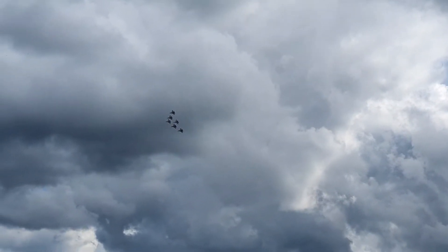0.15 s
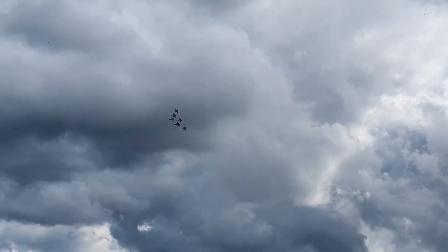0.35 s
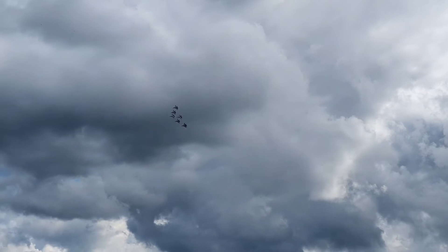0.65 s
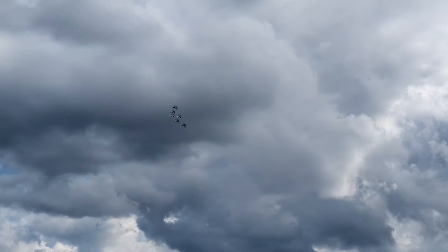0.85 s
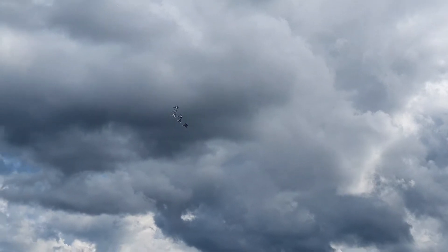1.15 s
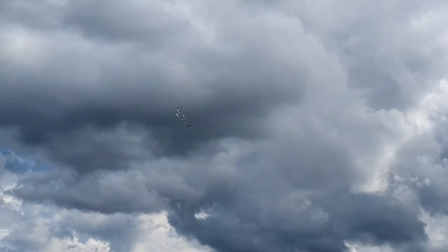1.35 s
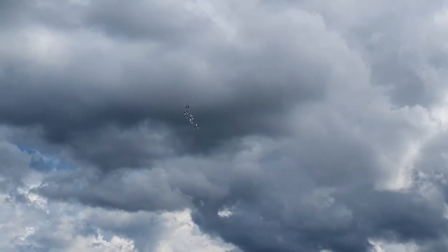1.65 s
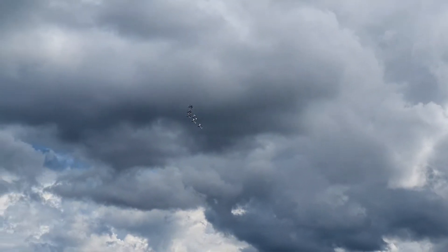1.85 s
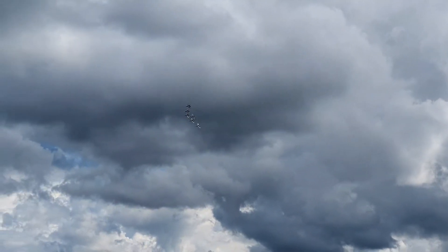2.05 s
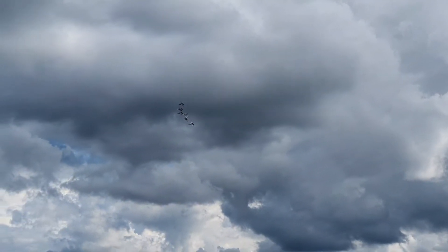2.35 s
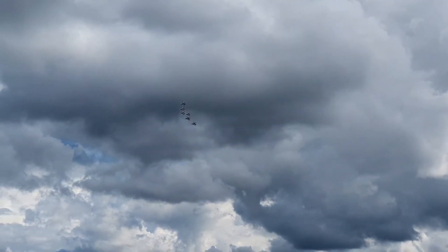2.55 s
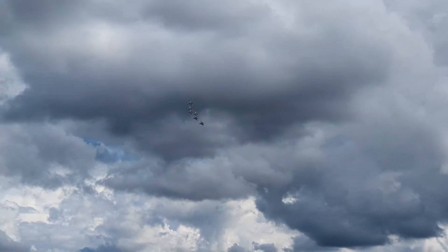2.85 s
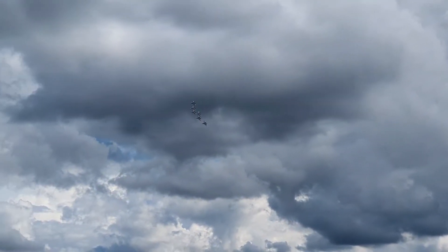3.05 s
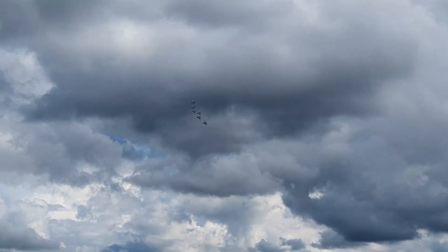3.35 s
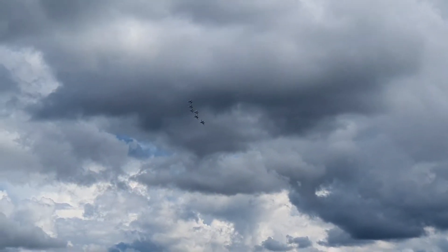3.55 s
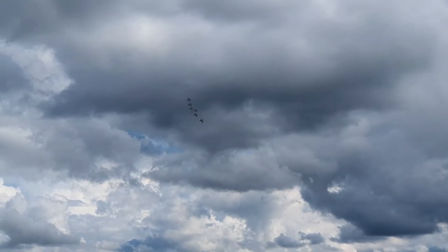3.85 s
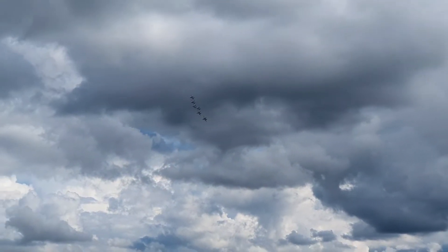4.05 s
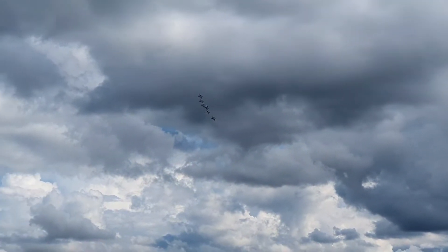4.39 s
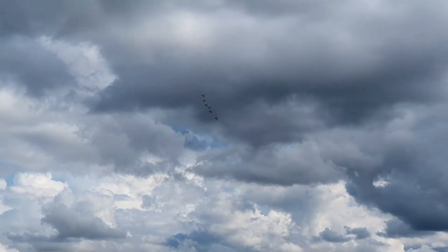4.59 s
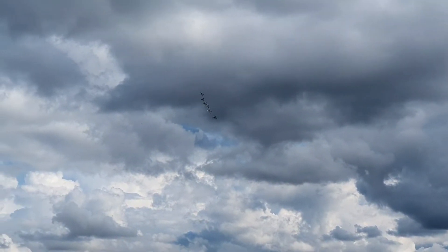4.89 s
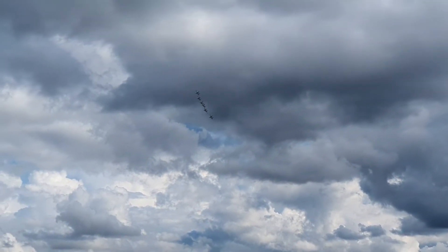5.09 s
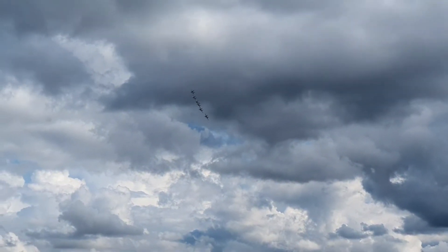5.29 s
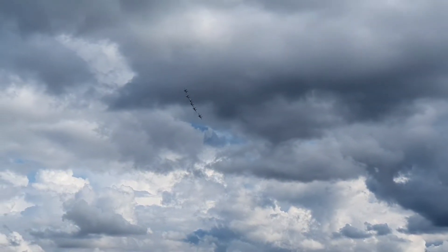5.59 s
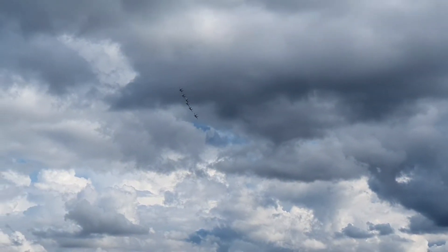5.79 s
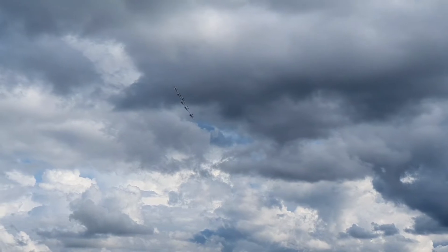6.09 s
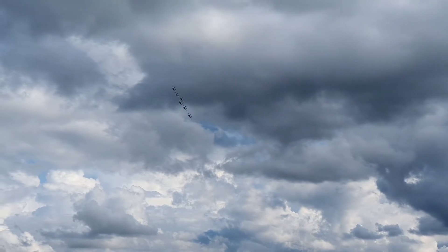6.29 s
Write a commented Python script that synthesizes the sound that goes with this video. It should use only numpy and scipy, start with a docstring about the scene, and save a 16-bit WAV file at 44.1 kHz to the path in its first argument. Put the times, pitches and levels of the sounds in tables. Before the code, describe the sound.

Deep, dull jet roar from a distant fighter formation overhead, surging loudly, sinking to a low rumble, then swelling again in uneven waves.

```python
"""Jet formation over an airfield

Jet fighters wheel high overhead, heard at two microphones. The exhaust roar is shaped noise that swells in
waves, dulled by the long air path and hollowed by a ground echo. Under it: deep rumble noise, wind buffeting
and hiss that follow one breeze curve, a thin wavering sine, and faint short bursts of high noise."""
import sys
import numpy as np
from scipy import signal
from scipy.fft import rfft, irfft
from scipy.io import wavfile
from scipy.ndimage import uniform_filter1d, minimum_filter1d

SR = 44100
rng = np.random.default_rng(int(sys.argv[2]) if len(sys.argv) > 2 else 0)


def wav_record(signal):
    """Record a signal, one row per channel, as 16-bit PCM in the file named by sys.argv[1]."""
    frames = np.transpose(np.atleast_2d(signal))
    bounded = np.clip(frames, -1, 1)
    # unit amplitude maps onto the largest positive 16-bit level
    quanta = np.round(bounded * 32767).astype(np.int16)
    wavfile.write(sys.argv[1], SR, quanta)


N = 283563

FRAME, HOP = 1024, 256  # samples
TIME_S = np.arange(N) / SR
FRAME_S = np.arange(N // HOP + 5) * HOP / SR
BIN_HZ = np.fft.rfftfreq(FRAME, 1 / SR)

# roar registers boom, rush, rasp: low edge f/Hz, high edge f/Hz
REGISTERS_HZ = [(170, 500), (500, 1100), (1100, 3000)]
# roar spectrum, falling steeply where the air absorbs it: f/Hz, relative density/dB
ROAR_COLOUR = [(110, -23.5), (190, -5), (280, 2), (400, -0.9), (500, -5.5), (700, -7), (830, -9.5),
               (980, -10), (1170, -12.5), (1420, -10.5), (1640, -19.5), (1900, -16), (2230, -22),
               (2480, -31), (2800, -36.5), (3400, -49), (5000, -65), (8000, -93.5), (11000, -125)]
# rumble spectrum: f/Hz, relative density/dB
RUMBLE_COLOUR = [(8, -60.5), (22, -29), (42, -9), (64, 3), (100, 1.5), (140, -2), (190, -4.5), (300, -22.5),
                 (700, -53), (5000, -125)]
# wind-buffeting spectrum: f/Hz, relative density/dB
GUST_COLOUR = [(8, -46.5), (22, -7.5), (55, 0.5), (110, -0.5), (200, -5.5), (400, -17), (4000, -115)]
# hiss spectrum: f/Hz, relative density/dB
HISS_COLOUR = [(1500, -18.5), (3300, -4), (3900, -5), (4250, 1), (5200, -7.5), (6100, -2.5), (6800, -7.5),
               (7400, -7), (8200, -21), (9300, -15), (9800, -50), (13000, -80)]
# microphone pair: f/Hz, likeness/0-1, phase lead of left/rad, left minus right/dB
PORTS = [(35, 1, 0.6, 0.5), (130, 0.95, -0.64, -0.2), (340, 0.96, 0.06, 0.2), (520, 0.75, 0, 2),
         (690, 0.88, -1.14, 0.8), (810, 0.95, -0.86, 0), (1020, 1, -1.63, -0.5), (1450, 0.91, -1.41, 0.6),
         (1710, 0.85, -2.5, -2), (2010, .7, -2, -2.5), (2420, 0.9, -2, -0.5), (2500, 0.3, -3, 3.5),
         (2820, 0.7, -3, 4.3), (3350, 0, 0, 0.5), (4400, 0.6, 1, 0), (5100, 0.6, 2.5, 6),
         (6000, .5, 1, -2.5), (7400, .5, 2.5, -4.5), (8400, 1, 3, 9)]
# low boom of the roar: t/s, level/dB before brief changes and eddies
BOOM = [(0, -18), (0.22, -16.5), (0.4, -12.5), (0.7, -11.5), (0.8, -9.5), (1.03, -13), (1.11, -19),
        (1.75, -19.5), (2.22, -17.5), (2.35, -23), (2.65, -24.5), (2.9, -21.5), (3.1, -18.5), (3.28, -19.5),
        (3.53, -19.5), (3.66, -25), (3.96, -19), (4.25, -15), (4.62, -14), (4.8, -18), (5.3, -19.5),
        (5.5, -16), (5.74, -14.5), (5.92, -21), (6.42, -19.5)]
# middle rush of the roar: t/s, level/dB before brief changes and eddies
RUSH = [(0, -22.5), (0.2, -24), (0.4, -19), (0.63, -13.5), (0.72, -18), (0.89, -15.5), (1.04, -22),
        (1.35, -27.5), (2.4, -28), (2.86, -28.5), (3, -25), (3.5, -22), (3.95, -24), (4.22, -13.5),
        (4.42, -12), (4.7, -17), (4.8, -21), (5.25, -24), (5.52, -18.5), (5.76, -17), (5.97, -21),
        (6.42, -14.5)]
# rasp on top of the roar: t/s, level/dB before brief changes and eddies
RASP = [(0, -26), (0.22, -25.5), (0.35, -23), (0.48, -26), (0.62, -22.5), (0.9, -24), (1.25, -30.0),
        (2.65, -31.5), (3.3, -30), (3.98, -28), (4.35, -21), (4.68, -24), (5, -30.5), (5.25, -29.5),
        (5.6, -25.5), (6, -26), (6.25, -24), (6.42, -22)]
# boom slope, changing from wave to wave: t/s, slope/(dB per octave)
BOOM_TILT = [(0, -0.5), (0.75, -3), (1.5, 5), (2.4, -1), (3.1, 0.5), (4.2, -3), (5.0, -1.5), (5.6, 5),
             (6.4, 7.5)]
# ground echo, sooner on the whole as the jets sink: t/s, delay/ms, strength/0-1 before frequency limits
ECHO = [(0, 3.2, .15), (0.35, 3.2, .5), (0.65, 3.14, .64), (0.92, 3.22, .66), (1.2, 3.25, .28),
        (2.3, 3.0, .12), (3.1, 2.95, .33), (3.95, 2.85, .25), (4.35, 2.87, .7), (4.8, 2.8, .3),
        (5.2, 2.68, .4), (5.7, 2.6, .46), (6.4, 2.65, .62)]
# brief level changes of roar and rumble: t/s, peak change/dB, centre f/Hz
BRIEF_CHANGES = [(0.037, 2.5, 430), (0.378, 4, 300), (0.462, 3, 450), (0.609, 3.5, 330), (0.713, 0, 180),
                 (0.81, -0.5, 71), (0.841, 3.5, 430), (0.893, 6, 570), (2.05, 7, 69), (3.008, 4, 453),
                 (3.109, 5.3, 290), (3.505, 6.5, 200), (4.075, 4, 180), (4.159, 4, 420), (4.283, 7.5, 240),
                 (4.408, 9.5, 504), (4.604, 5, 346), (5.436, 7.5, 210), (5.539, 8, 480), (5.684, 4.5, 397),
                 (5.745, 4.5, 260), (6.325, 8, 500)]
# rumble: t/s, level/dB before trim and brief changes
RUMBLE = [(0, -27), (0.43, -27.5), (0.72, -20), (0.95, -23), (1.45, -31.5), (1.8, -27), (2.65, -28),
          (3.5, -24), (3.75, -25.5), (4.05, -23), (4.65, -21), (4.8, -26.5), (5.45, -21.0), (5.95, -24.5),
          (6.42, -24.5)]
# light breeze, as its hiss: t/s, level/dB before patches
BREEZE = [(0.03, -60), (0.4, -69), (0.85, -64), (1.01, -74), (1.76, -66.5), (1.9, -64), (2.56, -62),
          (2.74, -68.5), (3.59, -58), (4.13, -64), (4.19, -60), (4.24, -70.5), (4.64, -65), (5.0, -67),
          (5.33, -65), (5.7, -65.5), (6.3, -68.5)]
# faint short bursts of high noise: t/s, level/dB before trim and fade, centre f/Hz, width/Hz, left minus right/dB
BURSTS = [(3.116, -54, 12500, 800, -19), (3.196, -56, 12500, 1000, -15), (4.17, -56.5, 9000, 3500, 1),
          (4.482, -56, 5800, 1600, 14), (4.924, -56, 7500, 3200, 9), (5.606, -52, 7500, 4830, 7),
          (5.817, -53, 6200, 3000, 5)]

RUSH_TILT_DB_PER_OCT, RUSH_TILT_RISE_DB_PER_OCT_S = -2, 1.1  # rush brightens with time
BLUR_HZ, SCATTER_HZ = 270, 1700  # echo fades below / above these
CHANGE_S, CHANGE_CYCLES, CHANGE_OCTAVES = 0.011, 3.6, 0.8  # half-widths; the cycles make deep ones longer
GUST_PEAK_DB, GUST_DB_PER_HISS_DB = -30.5, 0.28  # before lumps
WHINE_HZ, WHINE_DB = 9100, -79.5  # centre; rms before balance
CUTOFF_HZ = 13500


def gain_of(db):
    """Decibels to an amplitude factor."""
    return 10 ** (np.asarray(db) / 20)


def evened(x):
    """Scale to unit rms."""
    return x / np.sqrt(np.mean(x ** 2) + 1e-20)


def over_time(rows, t_s):
    """Interpolate each column of a time table at t_s."""
    knots_s, *columns = np.transpose(rows)
    return [np.interp(t_s, knots_s, column) for column in columns]


def over_bins(rows):
    """Interpolate each column of a spectrum table at every bin, on log frequency."""
    knots_hz, *columns = np.transpose(rows)
    return [np.interp(np.log(BIN_HZ + 1), np.log(knots_hz), column) for column in columns]


def patches(span_s, span_hz):
    """Smooth random field over time and frequency, unit rms."""
    shape = (len(FRAME_S), len(BIN_HZ))
    field = np.fft.rfft2(rng.standard_normal(shape))
    along = np.fft.fftfreq(shape[0], HOP / SR)[:, None] * span_s
    across = np.fft.rfftfreq(shape[1], SR / FRAME) * span_hz
    field *= np.exp(-np.pi * (along ** 2 + across ** 2))
    field[0, 0] = 0  # zero mean
    return evened(np.fft.irfft2(field, shape))


def band_rms(field, lo_hz, hi_hz):
    """Band level per frame in the mean of the two microphones, from likeness and phase."""
    likeness, phase_rad, _ = over_bins(PORTS)
    shared = (1 + np.clip(likeness, 0, 1) * np.cos(phase_rad)) / 2
    in_band = (BIN_HZ >= lo_hz) * (BIN_HZ < hi_hz)
    return np.sqrt((field ** 2 * shared * in_band).sum(-1, keepdims=True))


def steady_noise(steadiness=0.53, span_frames=9, span_bins=7):
    """White-noise short-time spectra, chance swells partly levelled by local power."""
    white = rng.standard_normal((len(FRAME_S) - 1) * HOP)
    spectra = signal.stft(white, nperseg=FRAME, noverlap=FRAME - HOP)[2].T
    power = uniform_filter1d(abs(spectra) ** 2, span_frames, 0)
    power = uniform_filter1d(power, span_bins, 1)
    spectra = spectra / power ** (steadiness / 2)
    return spectra / np.sqrt(np.mean(abs(spectra) ** 2))


def noise_at_ports(field):
    """Noise of the given short-time spectrum at two microphones, partly alike and phase-shifted."""
    likeness, phase_rad, balance_db = over_bins(PORTS)
    likeness = np.clip(likeness, 0, 1)
    left = steady_noise()
    right = likeness * left + np.sqrt(1 - likeness ** 2) * steady_noise()
    right = right * np.exp(-1j * phase_rad)
    pair = np.array([left * gain_of(balance_db / 2), right * gain_of(-balance_db / 2)])
    sound = signal.istft((pair * field).swapaxes(1, 2), nperseg=FRAME, noverlap=FRAME - HOP)[1]
    overlap_gain = np.sqrt(3 / 4)
    return overlap_gain * sound[:, :N]


def brief_changes_db():
    """Brief level changes of roar and rumble, Gaussian in time and in octaves about each centre."""
    t_s = FRAME_S[:, None]
    change_db = 0
    for s, db, hz in BRIEF_CHANGES:
        in_time = np.exp(-((t_s - s) / (CHANGE_S + CHANGE_CYCLES / hz)) ** 2)
        in_pitch = np.exp(-(np.log2((BIN_HZ + 1) / hz) / CHANGE_OCTAVES) ** 2)
        change_db = change_db + db * in_time * in_pitch
    return change_db


def roar(flutter_db=0.84, flutter_s=0.016, patchy_db=1.46, patch_s=0.04, patch_hz=170,
         boom_hz=330, rush_hz=740, rasp_hz=1400):
    """Exhaust turbulence noise, combed by the ground echo and shaken by the moving air."""
    t_s = FRAME_S[:, None]
    delay_ms, strength = over_time(ECHO, t_s)
    lag_turns = BIN_HZ * delay_ms / 1000
    strength = strength * np.exp(-(BIN_HZ / SCATTER_HZ) ** 2)  # rough ground scatters treble
    strength = strength * (1 - np.exp(-(BIN_HZ / BLUR_HZ) ** 2))  # deep roar fills its lowest notch
    # direct sound plus echo: notches climb as the delay shortens
    field = gain_of(over_bins(ROAR_COLOUR)[0]) * abs(1 + strength * np.exp(-2j * np.pi * lag_turns))

    boom_octaves = np.log2(np.clip(BIN_HZ, *REGISTERS_HZ[0]) / boom_hz)
    field = field * gain_of(over_time(BOOM_TILT, t_s)[0] * boom_octaves)
    rush_octaves = np.log2(np.clip(BIN_HZ, *REGISTERS_HZ[1]) / rush_hz)
    rush_tilt = RUSH_TILT_DB_PER_OCT + RUSH_TILT_RISE_DB_PER_OCT_S * t_s
    field = field * gain_of(rush_tilt * rush_octaves)

    # registers swell as the exhaust beams sweep past, each blending into its neighbours
    centres_hz = (boom_hz, rush_hz, rasp_hz)
    swell_db = 0
    for curve, edges_hz, own in zip((BOOM, RUSH, RASP), REGISTERS_HZ, np.eye(len(REGISTERS_HZ))):
        share = over_bins(list(zip(centres_hz, own)))[0]
        present_db = 20 * np.log10(band_rms(field, *edges_hz))
        swell_db = swell_db + share * (over_time(curve, t_s)[0] - present_db)

    # eddies on the way: broad flutter, narrow blooms
    eddies_db = flutter_db * patches(flutter_s, 1300) + patchy_db * patches(patch_s, patch_hz)
    return noise_at_ports(field * gain_of(swell_db + brief_changes_db() + eddies_db))


def rumble(trim_db=-0.3, lumpy_db=0.2):
    """Deepest exhaust noise, nearly alike at both microphones."""
    colour = gain_of(over_bins(RUMBLE_COLOUR)[0])
    swell_db = over_time(RUMBLE, FRAME_S[:, None])[0] + lumpy_db * patches(0.027, 120)
    level_db = trim_db + swell_db + brief_changes_db()
    return noise_at_ports(colour / band_rms(colour, 20, 170) * gain_of(level_db))


def gusts(lumpy_db=7.5):
    """Breeze buffeting each microphone independently, in short puffs of low noise."""
    colour = gain_of(over_bins(GUST_COLOUR)[0])
    breeze_db = over_time(BREEZE, FRAME_S[:, None])[0]
    blow_db = GUST_PEAK_DB + GUST_DB_PER_HISS_DB * (breeze_db - breeze_db.max())
    puffs_db = lumpy_db * np.tanh(patches(0.07, 300))
    field = colour / np.linalg.norm(colour) * gain_of(blow_db + puffs_db)
    return np.array([noise_at_ports(field)[port] for port in range(2)])  # fresh noise per side


def hiss(patchy_db=1.9):
    """Faint airy noise close by, swelling with the breeze."""
    colour = gain_of(over_bins(HISS_COLOUR)[0])
    swell_db = over_time(BREEZE, FRAME_S[:, None])[0] + patchy_db * patches(0.037, 900)
    return noise_at_ports(colour / band_rms(colour, 4170, 8000) * gain_of(swell_db))


def whine(waver_hz=16, flicker_db=4):
    """Thin sine, its pitch and level wandering with smoothed noise of the given rms."""
    drift, flicker = (evened(uniform_filter1d(noise, size=1200)) for noise in rng.standard_normal((2, N)))
    phase_rad = 2 * np.pi * np.cumsum(WHINE_HZ + waver_hz * drift) / SR
    tone = gain_of(flicker_db * flicker) * np.sin(phase_rad)
    balance_db = [[3], [-4]]  # left, right
    return gain_of(WHINE_DB) * evened(tone) * gain_of(balance_db)


def high_bursts(rise_s=.0015, decay_s=0.0086, trim_db=0.5):
    """Faint short bursts of high noise, panned by level, with a fast rise and decay."""
    out = np.zeros((2, N))
    length = FRAME * 2
    hz = np.fft.rfftfreq(length, 1 / SR)
    age_s = TIME_S[:length]
    fade = (1 - np.exp(-age_s / rise_s)) * np.exp(-age_s / decay_s)
    for s, db, pitch_hz, width_hz, pan_db in BURSTS:
        band = np.exp(-((hz - pitch_hz) / width_hz) ** 2)
        burst = irfft(rfft(rng.standard_normal((2, length))) * band)
        placed = evened(burst * gain_of([[pan_db / 2], [-pan_db / 2]]))
        out[:, round(s * SR):][:, :length] += gain_of(trim_db + db) * placed * fade
    return out


def scene():
    """Sum of roar, rumble, buffeting, hiss, whine and high noise bursts."""
    return roar() + rumble() + gusts() + hiss() + whine() + high_bursts()


def record(dry, ceiling=0.98, low_cut_hz=21):
    """Microphone bass loss, smooth peak limiter, softened ends, then the band limit."""
    dry = signal.sosfilt(signal.butter(2, low_cut_hz, "highpass", fs=SR, output="sos"), dry)
    allowed = np.minimum(1, ceiling / (abs(dry).max(0) + 1e-9))
    ease = signal.windows.hann(301)
    cut = signal.oaconvolve(1 - minimum_filter1d(allowed, size=301), ease / ease.sum(), "same")
    soft_ends = signal.windows.tukey(N, .0005)
    low_pass = signal.firwin(511, CUTOFF_HZ, window=("kaiser", 9), fs=SR)
    return signal.oaconvolve(dry * (1 - cut) * soft_ends, low_pass[None], "same", axes=1)


dry = scene()
out = record(dry)
wav_record(out)
```